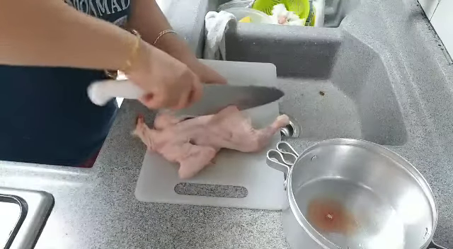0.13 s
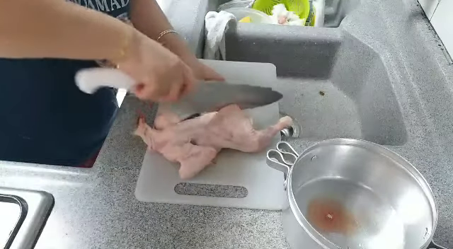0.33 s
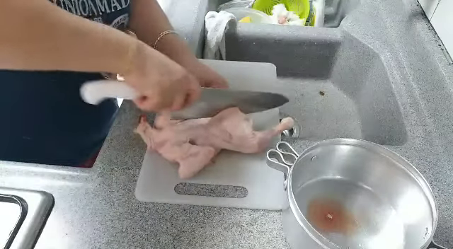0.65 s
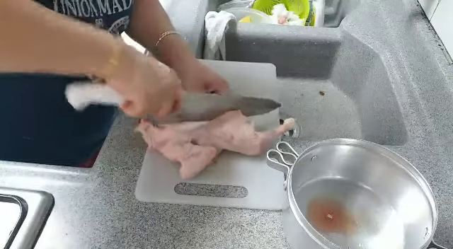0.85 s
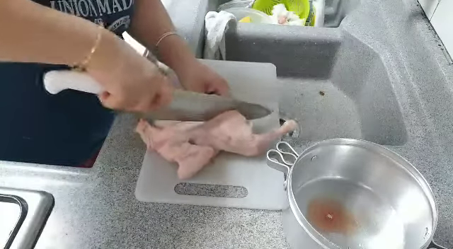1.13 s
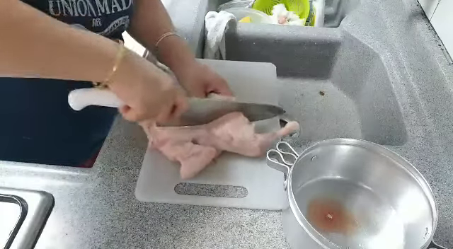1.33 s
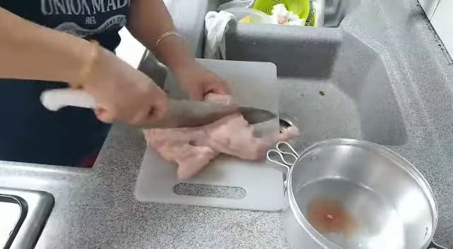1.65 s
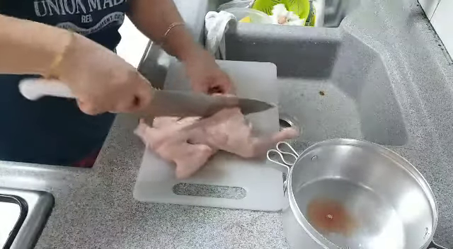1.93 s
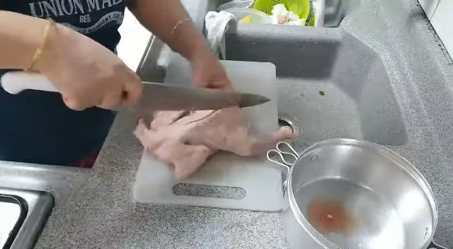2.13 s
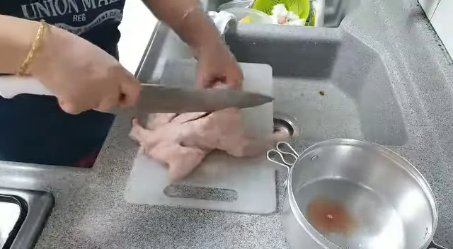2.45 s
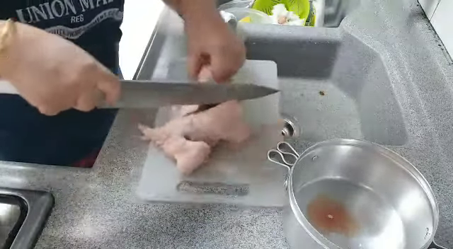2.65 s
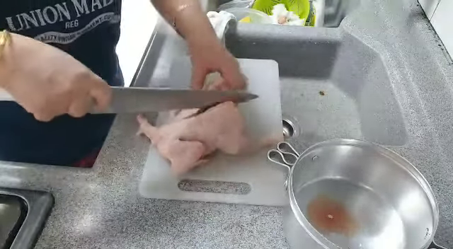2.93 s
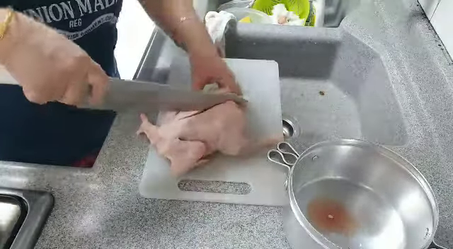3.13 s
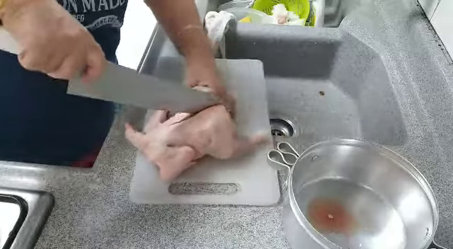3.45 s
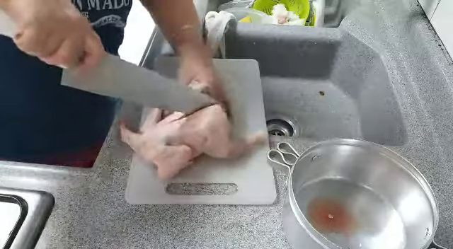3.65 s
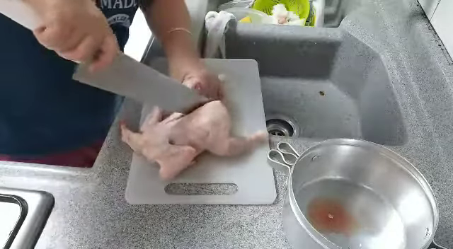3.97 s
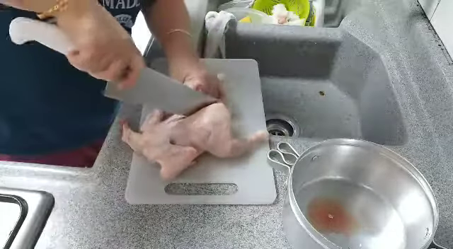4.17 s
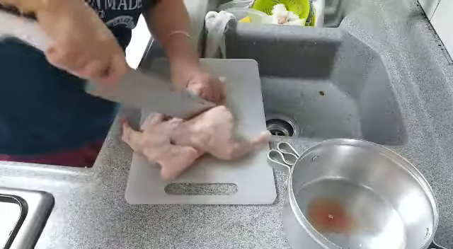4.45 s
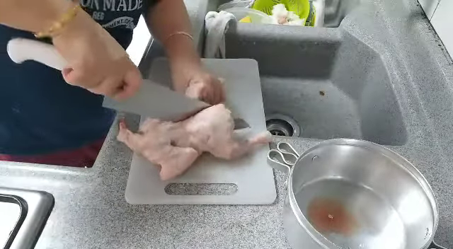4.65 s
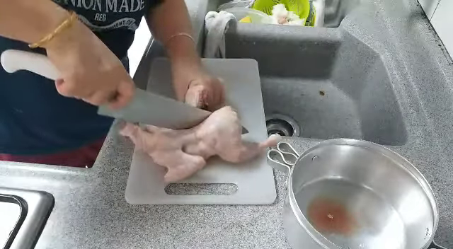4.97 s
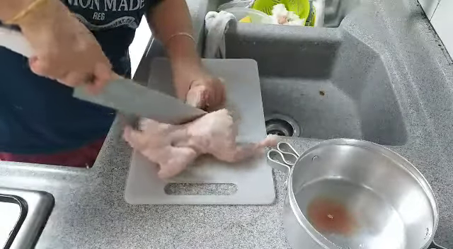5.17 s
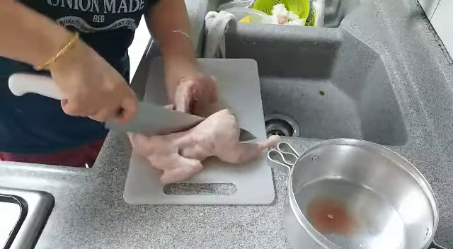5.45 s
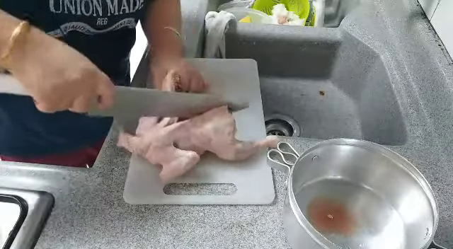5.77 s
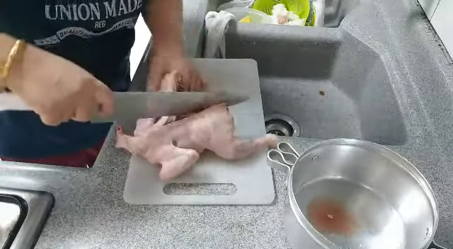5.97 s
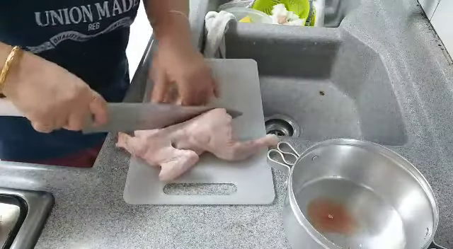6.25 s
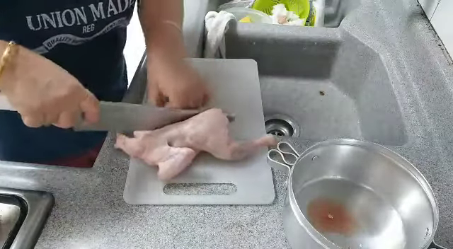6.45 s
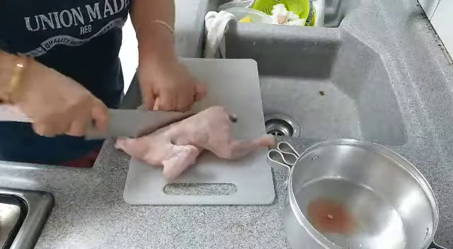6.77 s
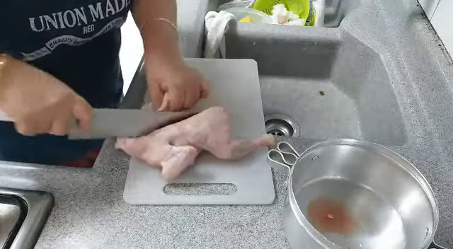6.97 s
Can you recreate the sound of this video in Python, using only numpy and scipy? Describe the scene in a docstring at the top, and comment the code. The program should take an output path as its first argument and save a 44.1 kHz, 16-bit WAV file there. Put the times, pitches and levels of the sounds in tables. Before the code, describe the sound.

Close up in a small kitchen, a knife works through raw chicken, crackling and squelching in uneven strokes and knocking on a plastic cutting board. After a quieter stretch with one sharp knock, the crunching returns with tiny squeaks of the skidding edge. A loud, dry bone crack with a short steel ring is the peak, followed by one more crisp tear. A faint low rush lies underneath, and everything is nearly mono.

```python
"""Wet hissing slices and crunches of gristle: a large kitchen knife cuts up a raw chicken on a plastic board.
Tearing fibres hiss and crackle, pockets of air and juice squelch, and the edge skids and knocks on the
board. Once a bone gives way with a hard crack that sets blade and board ringing; meat lands in soft thumps.
A small kitchen rings briefly over a low steady rush; the sound is nearly mono."""
import sys
import numpy as np
from scipy import signal
from scipy.fft import rfft, irfft
from scipy.io import wavfile

SR = 44100
rng = np.random.default_rng(int(sys.argv[2]) if len(sys.argv) > 2 else 0)


def store_pcm(level_fs):
    """Save levels as 16-bit WAV."""
    pcm = np.round(np.clip(level_fs, -1, 1) * 32767).astype(np.int16)
    wavfile.write(sys.argv[1], SR, np.atleast_2d(pcm).T)


N = 313506
TIME = np.arange(N) / SR

# The plastic board's modes. Each row: pitch in Hz, level in dB when struck under the meat,
# level in dB when struck bare, undamped t60 in seconds.
BOARD_MODES = [(104.5, -12.5, -11, 0.17), (142.8, -21, -9, 0.2), (237.5, 0, -6, 0.11),
               (293, -2.5, -17, 0.056), (407, -22, -8, 0.043), (540, -0.5, -5.5, 0.12),
               (571, -6, -7.5, 0.082), (636.3, -23, 2.5, 0.13), (699, -16, 2, 0.052), (802, -20, -19, 0.11),
               (917, -7, -8, 0.05), (1140, -24, -7, 0.041), (1566, 0.5, -3, 0.018)]
# The free blade's modes. Each row: pitch in Hz, level in dB, undamped t60 in seconds.
STEEL_MODES = [(930, -37, 0.18), (1138, -40, 0.19), (1810, -37, 0.5), (2270, -48, 0.36), (2780, -32, 0.19),
               (3580, -27, 0.33), (5900, -27, 0.2), (6840, -24, .22), (7042, -31, .2), (7150, -16, .2)]
GRIP_DAMPING = 0.96   # share of the steel's ring time left by hand and meat
# Tone of the edge hitting something hard. Each row: frequency in Hz, relative level in dB.
CLACK_SPECTRUM = [(50, -14), (150, 2.5), (480, -13), (720, -0.5), (1020, -1), (1350, -4.5), (1700, -3.5),
                  (2800, -9.5), (4500, -9), (8500, -4), (11000, -9.5), (13000, -16), (16000, -34)]
# The crisp top of tearing fibres. Each row: frequency in Hz, relative level in dB.
CRISP_SPECTRUM = [(150, -15), (600, -12.5), (1200, -10), (2600, -17), (4000, -8), (6000, -5), (8200, 0),
                  (12500, -2), (14500, -1), (16500, -10)]


def from_db(db):
    """Decibels to gain."""
    return 10 ** (np.asarray(db) / 20)


def rms_one(x):
    """Scale to unit rms."""
    return x / np.sqrt(np.mean(x ** 2) + 1e-20)


def at_hz(points, hz, column=1):
    """Read one column of a table on a log-frequency axis."""
    table = np.array(points)
    return np.interp(np.log(np.maximum(hz, 1)), np.log(table[:, 0]), table[:, column])


def colour(x, spectrum, size=4096):
    """Minimum-phase EQ with the given spectrum and unit power gain."""
    gains = from_db(at_hz(spectrum, np.linspace(0, SR / 2, size // 2 + 1)))
    cepstrum = irfft(np.log(gains))
    cepstrum[1:size // 2] *= 2
    cepstrum[size // 2 + 1:] = 0
    response = irfft(np.exp(rfft(cepstrum)))
    return signal.fftconvolve(x, response / np.linalg.norm(response))[:len(x)]


def low_pass(x, hz, order=1):
    """Butterworth low-pass."""
    return signal.sosfilt(signal.butter(order, min(hz, .45 * SR), fs=SR, output="sos"), x)


def high_pass(x, hz):
    """Second-order Butterworth high-pass."""
    return signal.sosfilt(signal.butter(2, hz, "high", fs=SR, output="sos"), x)


def resonate(x, hz, width_hz):
    """One resonant peak."""
    return signal.lfilter(*signal.iirpeak(hz, hz / width_hz, fs=SR), x)


def add(track, s, sound):
    """Mix a sound into a track from time s."""
    start = max(round(s * SR), 0)
    track[start:start + len(sound)] += sound[:max(N - start, 0)]


def attack(t, rise_s):
    """An envelope that eases up from 0 to 1."""
    return 1 - np.exp(-t / rise_s)


def gate(t, length, edge):
    """An envelope that opens, holds for the length and dies away."""
    return attack(t, edge) * np.exp(-np.maximum(t - length, 0) / edge)


def flutter(samples, hz):
    """A random wobble, mostly slower than hz; rms 1."""
    return rms_one(low_pass(rng.standard_normal(samples), hz, order=2))


def grains(t, spread_db):
    """Dense tiny ruptures of uneven size; rms 1."""
    noise = rng.standard_normal(len(t))
    sizes = from_db(spread_db * np.clip(rng.standard_normal(len(t)), -2, 2))
    return rms_one(noise * sizes)


def ring(t, modes):
    """Damped sines, alternating in sign from mode to mode."""
    return sum((-1) ** k * from_db(db - 60 * t / t60) * np.sin(2 * np.pi * hz * t)
               for k, (hz, db, t60) in enumerate(modes))


def damped(modes, share):
    """The same modes, ringing for a share of their time."""
    return [(hz, db, t60 * share) for hz, db, t60 in modes]


def stereo_hiss(level_db=-77):
    """Faint steady stereo hiss."""
    # Each row: frequency in Hz, relative level in dB.
    spectrum = [(60, 0), (600, 1), (1500, -4.5), (4400, 0.5), (8000, 2.5), (15000, 2)]
    return from_db(level_db) * colour(rng.standard_normal(N), spectrum)


def background(level_db=-61, whir_db=-13):
    """A steady low rush, as of a far fan, with one broad resonance."""
    # The room tone. Each row: frequency in Hz, relative level in dB.
    rush_spectrum = [(15, -76.5), (25, -42), (105, 1.5), (256, -8.5), (363, -8), (489, -14), (754, -15),
                     (1370, -24.5), (1700, -26), (2280, -29.5), (5430, -28), (6380, -24), (8590, -25.5),
                     (11300, -28), (12400, -35.5), (14600, -24), (16000, -51)]
    rush = colour(rng.standard_normal(N), rush_spectrum)
    whir = rms_one(resonate(rush, hz=1700, width_hz=400))
    return from_db(level_db) * (rush + from_db(whir_db) * whir)


def kitchen(x, bands=9):
    """Dense reflections from counter, sink and walls; each band dies at its own rate."""
    # The room's reverb. Each row: frequency in Hz, t60 in seconds, level in dB.
    reverb = [(119, 0.48, -14), (230, 0.19, -7), (423, 0.3, -1.5), (850, 0.33, -9.5), (2100, 0.39, -3.5),
              (5530, 0.33, -6), (14000, 0.22, -7)]
    t, response = TIME[:SR * 3 // 4], 0
    edges = np.geomspace(60, 17000, bands + 1)
    for low, high in zip(edges, edges[1:]):
        hz = np.sqrt(low * high)
        band_pass = signal.butter(2, [low, high], "band", fs=SR, output="sos")
        band = signal.sosfilt(band_pass, rng.standard_normal(len(t)))
        tail = band * from_db(-60 * t / at_hz(reverb, hz)) * attack(t, 0.0022)
        band_share = np.sqrt(2 * (high - low) / SR)
        gain = band_share * from_db(at_hz(reverb, hz, column=2))
        response = response + gain * tail / np.linalg.norm(tail)
    return signal.fftconvolve(x, response)[:N]


def meat_drops():
    """Soft meat set down or pushed against the board wakes only the lowest modes."""
    # The landings. Each row: start in seconds, level in dB.
    drops = [(1.339, -48), (3.017, -36.5), (3.039, -41.5), (4.569, -49), (6.299, -59)]
    # The thump's modes. Each row: pitch in Hz, relative level in dB, t60 in seconds.
    thump_modes = [(147.5, 0, 0.14), (203, -2, 0.066), (246, -1, 0.06)]
    out, t = np.zeros(N), TIME[:SR // 2]
    for s, db in drops:
        add(out, s, from_db(db) * ring(t, thump_modes) * attack(t, 0.0024))
    return out


def band_noise(pitch_hz, width_hz):
    """Noise in one steep-sided resonance that follows a pitch; rms 1."""
    samples = len(pitch_hz)
    noise = rng.standard_normal((2, 2 * samples))   # the first half lets the filter settle
    in_phase, quadrature = low_pass(noise, width_hz / 2, order=2)[:, samples:]
    phase = 2 * np.pi * np.cumsum(pitch_hz) / SR
    return rms_one(in_phase * np.cos(phase) + quadrature * np.sin(phase))


def squeaks(chatter_db=1.0, sag_db=6.5, edge_share=0.056):
    """Steel sticks and slips, slides in pitch and loses force: a narrow band squeaks, a wide one rasps."""
    # The edge skidding on bone, skin and plastic. Each row: start in seconds, length in seconds,
    # first pitch in Hz, last pitch in Hz, bandwidth in Hz, opening level in dB.
    skids = [(1.331, 0.037, 5280, 4710, 1810, -43), (2.282, 0.2, 1800, 1600, 1400, -68.5),
             (2.278, 0.13, 901, 801, 600, -65.5), (2.545, .005, 5900, 5550, 1400, -59),
             (2.627, 0.0062, 5100, 4900, 750, -51), (2.638, 0.005, 4770, 4660, 600, -59),
             (2.655, 0.0058, 5000, 5200, 900, -52), (4.152, 0.15, 3690, 3440, 900, -69),
             (4.523, 0.02, 3370, 3420, 350, -53.5), (4.554, 0.042, 5260, 5330, 700, -44.5),
             (4.562, 0.014, 3956, 3690, 1400, -39), (5.4675, 0.008, 7180, 7010, 450, -20.5),
             (5.477, 0.0027, 7040, 7130, 450, -28), (5.4825, 0.002, 7200, 7100, 420, -29),
             (5.4847, 0.0021, 7150, 7000, 420, -21), (5.467, .028, 3680, 2890, 350, -37),
             (5.49, 0.029, 6200, 5930, 800, -33.5), (5.493, .02, 8240, 7970, 1800, -37.5),
             (6.644, 0.053, 3520, 3580, 300, -61), (6.67, 0.02, 4460, 4280, 450, -50.5),
             (6.674, 0.014, 7380, 6970, 3200, -44.5), (6.743, 0.099, 8360, 8200, 1400, -58),
             (6.735, 0.12, 11000, 10560, 250, -47.5)]
    out, t = np.zeros(N), TIME[:SR // 3]
    for s, length, first_hz, last_hz, width_hz, db in skids:
        chatter = chatter_db * flutter(len(t), hz=140)
        level = from_db(db + chatter - sag_db * t / length) * gate(t, length, edge_share * length)
        pitch_hz = np.interp(t, [0, length], [first_hz, last_hz])
        add(out, s, level * band_noise(pitch_hz, width_hz))
    return out


def contact(t, fade, contact_hz, first_touch=1.6, bite_s=0.00057):
    """One sharp touch and a short clatter, dulled by a soft contact."""
    clatter = grains(t, spread_db=1.5) * np.exp(-t / fade) * attack(t, bite_s)
    clatter[round(bite_s * SR)] += first_touch
    return low_pass(clatter, contact_hz)


def board_knocks(covered_hz=2260, bare_hz=8600, covered_ring_share=0.59, squeeze_s=0.00074):
    """The edge knocks on the board: bright where it is bare, duller and shorter under the meat."""
    # Blows and rebounds. Each row: start in seconds, clack level in dB, clatter fade in seconds,
    # board ring in dB, bareness from 0 (under the meat) to 1 (bare board).
    blows = [(0.098, -40, 0.01, -74, 0.044), (0.566, -25.5, 0.0043, -35.5, .05),
             (0.5745, -33, 0.0083, -35.5, .05), (0.981, -34.5, 0.0091, -34, 0.044),
             (0.9895, -43, 0.007, -40, 0.045), (1.317, -41, 0.012, -40, .05),
             (1.334, -34, 0.0069, -52, 0.054), (1.702, -48, .005, -72, .05), (2.272, -50, 0.011, -55, 0.02),
             (2.702, -28.5, 0.0086, -35, 0.96), (2.7168, -39, 0.011, -38, 0.98),
             (2.7271, -46, 0.013, -35, 0.86), (2.7433, -49, 0.044, -47, 0.81),
             (2.7665, -55, 0.012, -44, 0.68), (4.583, -41, .007, -54, 1), (4.988, -46, .008, -64, .3),
             (5.464, -31, 0.047, -39, 0.97)]
    clacks, rings = np.zeros((2, N))
    t = TIME[:SR // 2]
    for s, db, fade, ring_db, bareness in blows:
        contact_hz = covered_hz * (bare_hz / covered_hz) ** bareness
        add(clacks, s, from_db(db) * contact(t, fade, contact_hz))
        modes = [(hz, covered_db + bareness * (bare_db - covered_db), t60)
                 for hz, covered_db, bare_db, t60 in BOARD_MODES]
        board_ring = ring(t, damped(modes, covered_ring_share ** (1 - bareness)))
        # the force builds over a moment as the meat is squeezed
        add(rings, s, from_db(ring_db) * board_ring * attack(t, squeeze_s))
        # the steel rings only as far as it is clear of the meat
        add(rings, s, from_db(db) * bareness * ring(t, damped(STEEL_MODES, GRIP_DAMPING)))
    return colour(clacks, CLACK_SPECTRUM) + rings


def bone_break(board_db=-26, steel_db=-7):
    """Small fissures around one sharp, dry crack; blade and board ring with them."""
    # The bone splitting. Each row: start in seconds, level in dB, splinters relative to it in dB.
    splits = [(5.4527, -24.5, 8.5), (5.454, -22.5, 4.5), (5.4557, -9, -10.5), (5.4598, -33, 6),
              (5.4702, -46, 4), (5.4775, -32.5, 6)]
    # The bone's heavily damped modes. Each row: pitch in Hz, relative level in dB, t60 in seconds.
    bone_modes = [(736, -5.5, 0.0097), (1050, 1.5, 0.009), (1247, 1, 0.0068), (1640, -5, 0.011),
                  (2290, -6, 0.0074), (2910, -10, 0.0088), (4500, -7, 0.006)]
    cracks, splinters = np.zeros((2, N))
    t = TIME[:SR // 2]
    steel_ring = ring(t, damped(STEEL_MODES, GRIP_DAMPING))
    board_ring = ring(t, [(hz, bare_db, t60) for hz, _, bare_db, t60 in BOARD_MODES])
    crack = ring(t, bone_modes) + from_db(steel_db) * steel_ring + from_db(board_db) * board_ring
    for s, db, splinter_db in splits:
        add(cracks, s, from_db(db) * crack)
        add(splinters, s, from_db(db + splinter_db) * contact(t, fade=0.0037, contact_hz=6900))
    return cracks + colour(splinters, CLACK_SPECTRUM)


def crackle(t, pops_per_s=220, pop_db=17):
    """A fine tearing hiss in which single fibres snap louder."""
    pops = (rng.random(len(t)) < pops_per_s / SR) * rng.uniform(-0.93, 1, len(t))
    return rms_one(grains(t, spread_db=5.0) + from_db(pop_db) * pops)


def treble_shelf(x, db, corner_hz=10500):
    """Lift or lower the air above the corner."""
    low = low_pass(x, corner_hz)
    return low + from_db(db) * (x - low)


def tearing(crisp, body):
    """Torn fibres: a crisp top over a fuller midrange; the treble brightens and dulls on a set curve."""
    # Brightness of the cutting. Each row: time in seconds, treble shelf gain in dB.
    treble_curve = [(0.1, 3.5), (0.9, 0.5), (1.7, -12.5), (3.3, -14), (3.9, -4.5), (5.3, -1.5), (6.7, -16)]
    # The body of tearing flesh. Each row: frequency in Hz, relative level in dB.
    body_spectrum = [(80, 5.5), (160, 2.5), (400, -8.5), (900, 1), (1500, -2.5), (2600, -5), (4800, -1.5),
                     (8000, -4), (15000, -21)]
    treble_db = np.interp(TIME, *np.transpose(treble_curve))
    return colour(treble_shelf(crisp, treble_db), CRISP_SPECTRUM) + colour(body, body_spectrum)


def sinew_snaps(build_s=0.00099):
    """A taut sinew parts with a thin, bright snap, too light to move the blade."""
    # The sinews parting. Each row: start in seconds, level in dB, fade in seconds.
    snaps = [(0.2175, -42, .002), (4.6254, -32, 0.00055), (6.7349, -23, 0.0085)]
    out, t = np.zeros(N), TIME[:SR // 5]
    for s, db, fade in snaps:
        level = from_db(db) * attack(t, build_s) * np.exp(-t / fade)
        add(out, s, level * treble_shelf(crackle(t), db=-0.5))
    return high_pass(colour(out, CRISP_SPECTRUM), hz=3150)


def wet_pockets(x, squelch_hz, squelch_db=4, pocket_db=-3.0, count=4):
    """One large pocket of air and juice resonates, with smaller ones at chance pitches; rms 1."""
    squelch = resonate(x, squelch_hz, width_hz=1000)
    pitches = np.exp(rng.uniform(np.log(3200), np.log(14500), count))
    pockets = sum(resonate(x, hz, width_hz=300) for hz in pitches)
    return rms_one(x + from_db(squelch_db) * squelch + from_db(pocket_db) * pockets)


def gristle_crunches(burst_db=-6.5, body_db=-9, steel_db=7, build_s=0.0013, pitch_spread=0.054):
    """Gristle gives way in a quick snap or a longer wet burst that jolts the blade."""
    # Gristle and small bones giving way. Each row: time in seconds, relative crunch level in dB,
    # fade in seconds, relative level of the blade's jolt in dB, squelch pitch in Hz.
    crunches = [(0.1444, -59, .005, -50, 9000), (0.151, -61, .006, -49, 9000),
                (0.1654, -40, 0.0054, -63, 11000), (0.207, -35, 0.0044, -54, 10200),
                (0.2164, -33, 0.0036, -61, 9100), (0.5, -51, .005, -69, 9000),
                (0.5164, -42, 0.005, -60, 9000), (0.5195, -29.5, 0.0093, -44.5, 7200),
                (0.529, -33.5, 0.01, -46, 9500), (0.558, -27, 0.0071, -50, 14100),
                (0.566, -38, .006, -34.5, 7600), (0.9021, -32, 0.011, -47, 10300),
                (0.941, -26, 0.0054, -46.5, 14400), (0.9434, -24, 0.0054, -52, 5400),
                (0.9642, -27, .01, -41.5, 7900), (1.271, -50, .01, -55.5, 8300),
                (1.6467, -33, 0.013, -57, 6200), (1.7405, -31, 0.0045, -57, 6900),
                (2.546, -43, 0.0084, -72, 6000), (3.637, -48.5, .006, -73, 8000),
                (3.805, -46, .006, -63, 10000), (3.8125, -37, 0.006, -53.5, 8000),
                (3.8219, -32.5, .005, -49.5, 13100), (3.865, -40.5, 0.0086, -69, 10900),
                (3.947, -50, .005, -71, 9000), (4.061, -44, .002, -75, 8000),
                (4.506, -40, 0.0064, -66, 9700), (4.549, -41, .008, -52, 5200),
                (4.558, -27.5, .007, -44.5, 4100), (4.582, -18, 0.0056, -42.5, 8200),
                (4.6235, -21.5, 0.0047, -60, 10700), (4.988, -32, 0.0084, -52, 6550),
                (5.3817, -39, 0.0078, -61, 10300), (5.41, -35, 0.0088, -58, 11000),
                (6.779, -19, 0.0062, -52, 8600), (6.832, -20.5, 0.0067, -58, 7300)]
    # The blade's modes in the meat. Each row: pitch in Hz, level in dB, base t60 in seconds.
    blade_modes = [(840, -1.5, 0.044), (958, -1, 0.074), (1110, -19.5, 0.021), (1513, -1.5, 0.027)]
    crisp, body, jolts = np.zeros((3, N))
    t = TIME[:SR // 4]
    onset = attack(t, build_s)
    for s, db, fade, jolt_db, squelch_hz in crunches:
        start = s - build_s / 2
        burst = from_db(db + burst_db) * onset * np.exp(-t / fade)
        add(crisp, start, burst * wet_pockets(crackle(t, pops_per_s=500), squelch_hz))
        add(body, start, from_db(body_db) * burst * crackle(t))
        # the meat loads the blade differently at every jolt and shortens its ring
        loaded = [(hz * (1 + pitch_spread * rng.uniform(-0.53, 1)), mode_db, t60)
                  for hz, mode_db, t60 in blade_modes]
        add(jolts, start, from_db(jolt_db + steel_db) * onset * ring(t, damped(loaded, share=0.6)))
    return tearing(crisp, body) + jolts


def knife_strokes(slice_body_db=-2.5, glide_body_db=-7.5, press_body_db=-4, swell_db=24, catch_db=1.5):
    """The hiss follows the force on the blade: a slice holds, a glide rises and falls, a press swells."""
    # Firm forward cuts through flesh. Each row: start in seconds, length in seconds, level in dB.
    slices = [(0.101, 0.13, -59.5), (0.909, 0.063, -49), (1.263, 0.1, -48), (1.633, 0.12, -59.5),
              (3.796, 0.052, -59.5), (4.544, 0.075, -54), (6.756, 0.074, -43.5)]
    # The blade drawn lightly over wet skin. Each row: start in seconds, length in seconds, peak in dB.
    glides = [(0.322, 0.13, -63), (0.68, 0.15, -62), (1.062, 0.13, -52.5), (1.238, 0.043, -57.5),
              (1.45, 0.18, -58), (2.954, 0.31, -65.5), (3.343, 0.18, -65.5), (4.1, 0.14, -59),
              (4.3, 0.12, -64.5), (4.713, 0.15, -58.5), (4.9, 0.19, -63), (5.182, 0.13, -65),
              (6.598, 0.084, -60), (6.945, 0.19, -62.5)]
    # Leaning in until something gives. Each row: start in seconds, length in seconds, target level in dB.
    presses = [(4.47, 0.13, -41), (5.396, .05, -34), (6.657, 0.021, -46)]
    force, body = np.zeros((2, N))
    t = TIME[:SR // 2]
    strokes = [(s, from_db(db) * gate(t, length, edge=0.0054), slice_body_db) for s, length, db in slices]
    for s, length, db in glides:
        arch = np.abs(np.sin(np.pi * np.minimum(t / length, 1))) ** 0.44
        strokes.append((s, from_db(db) * arch, glide_body_db))
    for s, length, db in presses:
        swell = from_db(db - swell_db * np.maximum(1 - t / length, 0))
        strokes.append((s, swell * gate(t, length, edge=0.013), press_body_db))
    for s, level, body_db in strokes:
        add(force, s, level)
        add(body, s, level * from_db(body_db))
    catching = from_db(catch_db * flutter(N, hz=70))
    snags = crackle(TIME, pops_per_s=130, pop_db=19)
    return tearing(force * catching * snags, body * catching * crackle(TIME))


def scene(side_db=-38):
    """The work sits dead centre; only a little diffuse reverb and the hiss differ left to right."""
    cutting = knife_strokes() + gristle_crunches() + sinew_snaps()
    work = cutting + board_knocks() + bone_break() + meat_drops() + squeaks()
    work = high_pass(work, hz=75)   # the deep bass below 75 Hz is taken out of the work
    mid = work + kitchen(work) + background()
    side = from_db(side_db) * kitchen(work) + stereo_hiss()
    return np.array([mid + side, mid - side])


def record(dry, cutoff_hz=16000):
    """A steep low-pass takes off the very top."""
    return signal.sosfilt(signal.ellip(10, .1, 80, cutoff_hz, fs=SR, output="sos"), dry)


dry = scene()
out = record(dry)
store_pcm(out)
```